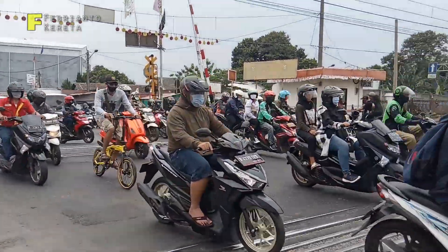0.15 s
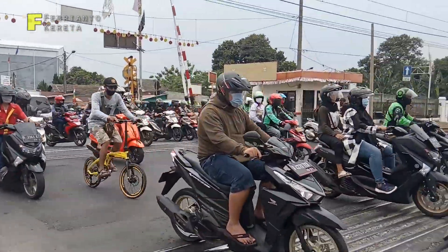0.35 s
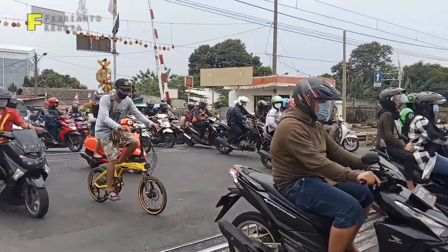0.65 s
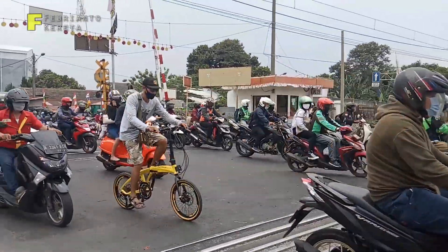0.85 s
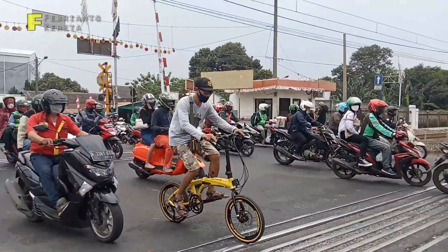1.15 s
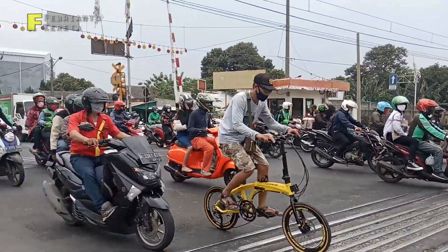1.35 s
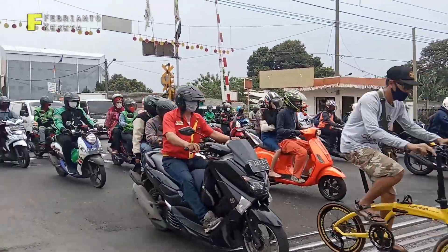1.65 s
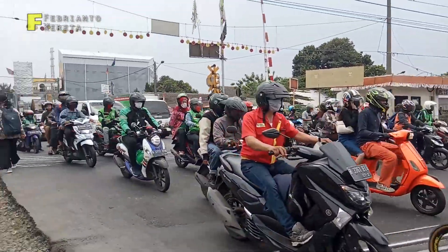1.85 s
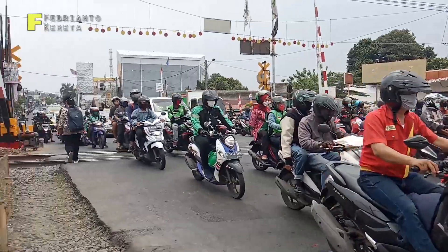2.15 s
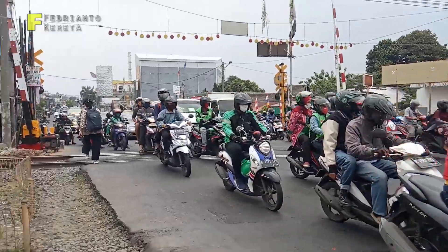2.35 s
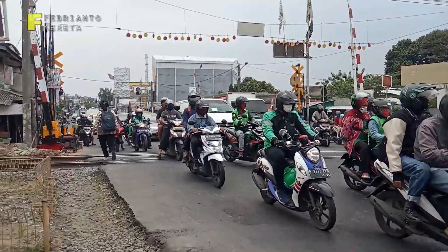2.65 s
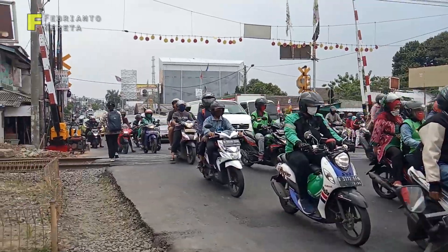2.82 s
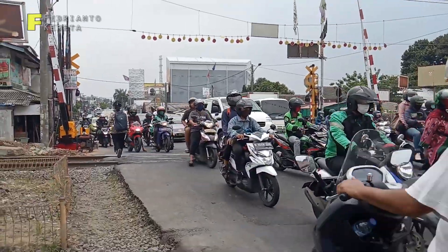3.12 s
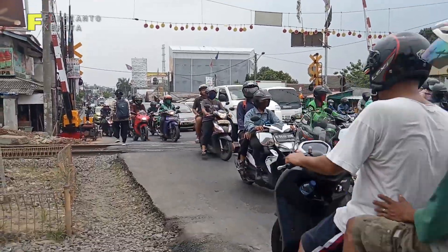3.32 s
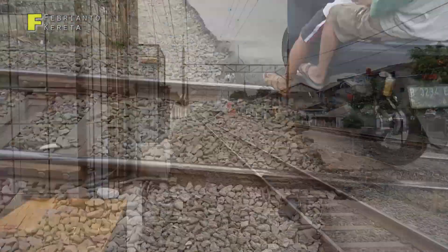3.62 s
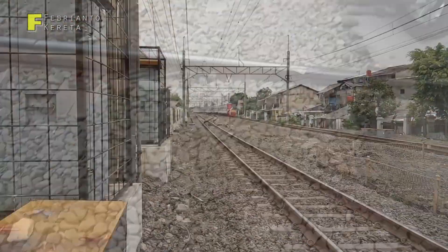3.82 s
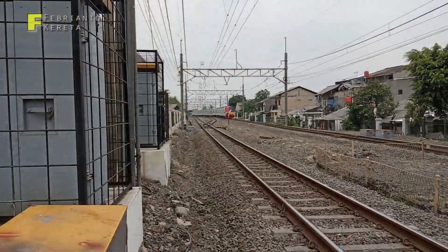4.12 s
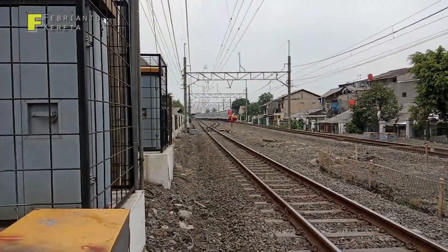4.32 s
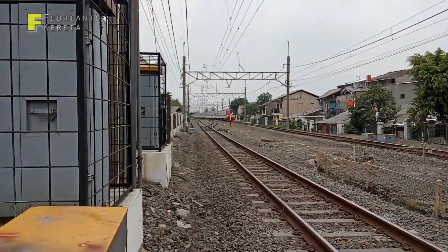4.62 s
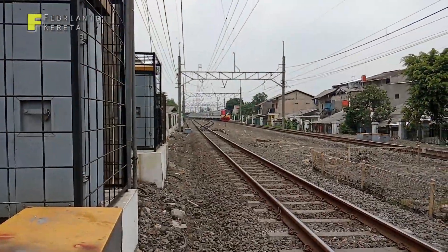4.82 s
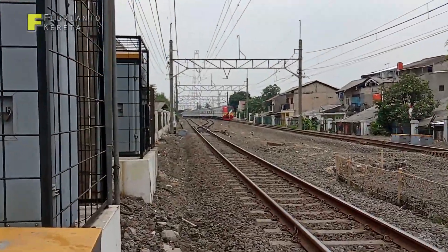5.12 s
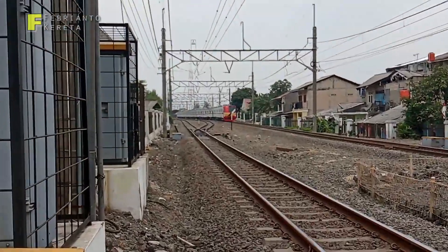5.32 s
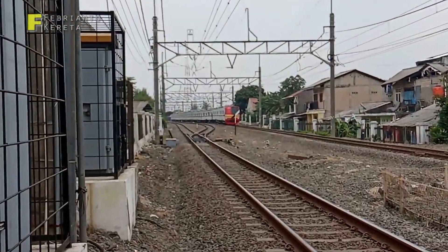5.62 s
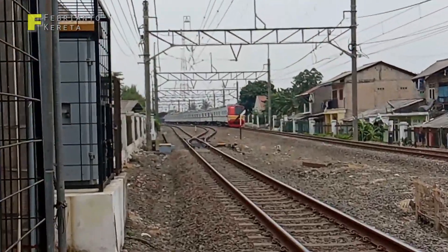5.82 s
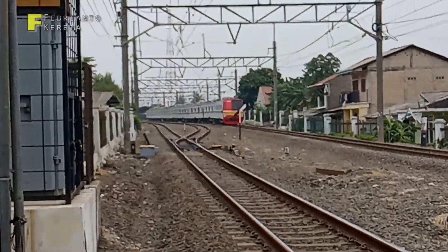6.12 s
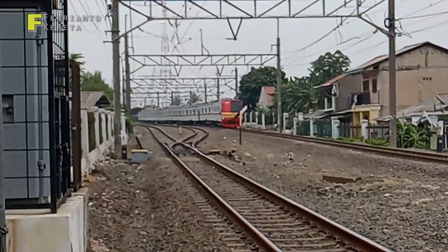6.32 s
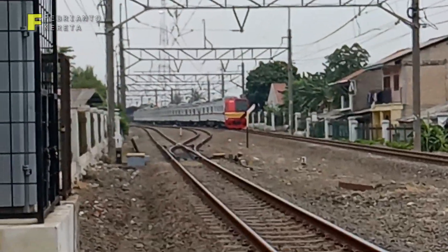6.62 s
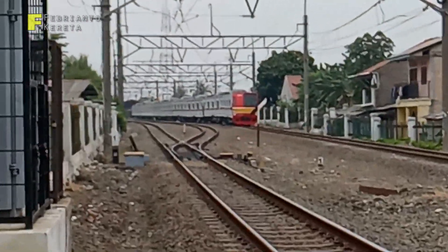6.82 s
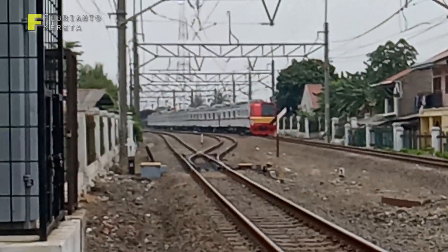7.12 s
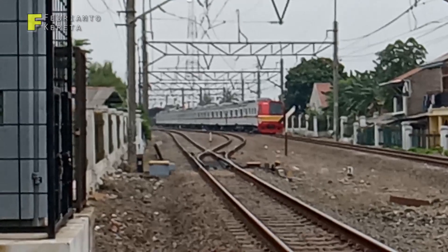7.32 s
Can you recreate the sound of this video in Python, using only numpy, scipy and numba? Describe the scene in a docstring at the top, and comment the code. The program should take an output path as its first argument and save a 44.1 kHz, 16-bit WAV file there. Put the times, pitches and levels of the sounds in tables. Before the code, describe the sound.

A crowd of scooters pulls across a railway crossing; after a brief dropout, a single-cylinder motorcycle chugs close by, speeding up twice.

```python
"""A railway crossing. A crowd of scooters pulls away: exhaust pulses ring the silencers, tyres rumble,
belt drives hiss and squeak. The sound cuts out briefly and fades in beside the track, where a
single-cylinder motorcycle chugs close by over distant traffic. Each firing rings its pipe; it picks up
speed twice and grows louder, with a bark and a rasp while the throttle is open."""
import sys
import numpy as np
from scipy import signal
from scipy.fft import rfft, irfft, next_fast_len
from scipy.io import wavfile
from scipy.ndimage import uniform_filter1d, minimum_filter1d
from numba import njit

SR = 44100
rng = np.random.default_rng(int(sys.argv[2]) if len(sys.argv) > 2 else 0)


def digitize_waveform(pressure):
    """Quantize a signal to 16-bit integers and store it at the path in sys.argv[1].

    Rows of a 2-D input are taken as channels; values are limited to [-1, 1].
    """
    field = np.atleast_2d(pressure).T
    bounded = np.clip(field, -1, 1)
    quanta = np.round(bounded * 32767).astype(np.int16)
    wavfile.write(sys.argv[1], SR, quanta)


N = 328879
TIME = np.arange(N) / SR
CUT_S, RESUME_S = 3.717, 3.812  # crossing ends, trackside begins


def undb(db):
    return 10 ** (np.asarray(db) / 20)


def unit(x):
    """Scale to rms 1."""
    return x / np.sqrt(np.mean(x ** 2) + 1e-20)


def curves(rows):
    """Each column of a table, joined by straight lines in time."""
    s, *columns = np.transpose(rows)
    return [np.interp(TIME, s, c) for c in columns]


def bump(centre_s, half_s):
    """Gaussian swell to 1 and back."""
    return np.exp(-.5 * ((TIME - centre_s) / half_s) ** 2)


def add(out, start_s, sound):
    """Mix a short sound in at its time."""
    i = max(int(start_s * SR), 0)
    out[i:i + len(sound)] += sound[:N - i]


def butter(x, hz, kind, order=2):
    return signal.sosfilt(signal.butter(order, hz, kind, fs=SR, output="sos"), x)


@njit
def band(x, hz, width):
    """State-variable band-pass with a moving centre, gain 1 there."""
    y, band_state, low_state = np.empty(len(x)), 0., 0.
    for i in range(len(x)):
        g, damping = np.pi * hz[i] / SR, width / hz[i]
        v = (band_state + g * (x[i] + 1e-18 - low_state)) / (1 + g * (g + damping))
        band_state = 2 * v - band_state
        low_state += 2 * g * v
        y[i] = damping * v
    return y


def ring(x, modes, tuning=0.93):
    """Parallel resonances (nominal Hz, width Hz, dB), centred at nominal Hz times tuning."""
    return sum(undb(db) * band(x, hz * tuning * np.ones(N), float(width)) for hz, width, db in modes)


def noise(colour):
    """Noise with a spectrum of (Hz, dB) points, rms 1."""
    hz, db = np.transpose(colour)
    size = next_fast_len(N)
    bins_hz = np.arange(size // 2 + 1) * SR / size
    gain = undb(np.interp(np.log(bins_hz + 1), np.log(hz), db))
    return unit(irfft(rfft(rng.standard_normal(size)) * gain, size)[:N])


def walk(rate_hz):
    """Smooth random wander, rms 1."""
    hold = max(int(SR / rate_hz), 2)
    steps = np.repeat(rng.standard_normal(N // hold + 2), hold)
    return unit(uniform_filter1d(steps, hold)[:N])


def firings(rate_hz, scatter_db, jitter_s, start_s=0, phase=0):
    """One slightly uneven pulse per engine cycle; also the place in the cycle, 0-1."""
    turns = phase + np.cumsum(rate_hz * (TIME >= start_s)) / SR
    due = np.flatnonzero(np.diff(np.floor(turns)))
    timing, strength = rng.standard_normal((len(due), 2)).T
    at = np.clip(due + (jitter_s * SR * timing).astype(int), 0, N - 1)
    pulses = np.zeros(N)
    pulses[at] = undb(scatter_db * strength) / np.sqrt(rate_hz[due])
    return pulses, turns % 1


def muffle(x, low_hz, top_hz):
    """A small tailpipe radiates no deep bass; the silencer takes the treble."""
    return butter(butter(x, low_hz, "highpass", order=3), top_hz, "lowpass", order=5)


def street(x, wet_db, fade_s):
    """Walls, fences and vehicles scatter a short tail into the gaps between beats."""
    t = TIME[:SR // 6]
    tail = rng.standard_normal(len(t)) * np.exp(-t / fade_s) * np.clip(t / 0.0048 - 1, 0, 1)
    echoes = signal.fftconvolve(butter(x, 112, "highpass"), tail / np.linalg.norm(tail))[:N]
    return x + undb(wet_db) * echoes


# Tyre spectrum. Each row: frequency in Hz, relative density in dB.
TYRE_COLOUR = [(30, -14.5), (70, 11), (400, 3.5), (700, -2), (930, 0.5), (1080, -3.5), (1250, -2.5),
               (1600, -10.5), (2300, -7.5), (3300, -8.5), (5000, -13.5), (15000, -26.5)]
# Plate rumbles. Each row: centre in seconds, half length in seconds, level in dB.
RUMBLES = [(0.126, 0.16, -30), (2.63, 0.43, -34), (3.67, 0.12, -25.5)]
def tyres(clatter, rolling_db=-32.5):
    """Tyres roll on the road and rumble over the crossing plates."""
    rumble_power = sum((undb(db) * bump(s, half_s)) ** 2 for s, half_s, db in RUMBLES)
    return noise(TYRE_COLOUR) * (1 + 0.14 * clatter) * np.sqrt(undb(rolling_db) ** 2 + rumble_power)


# Belt spectrum. Each row: frequency in Hz, relative density in dB.
BELT_COLOUR = [(2500, -6.5), (3600, -6), (4400, 2), (5100, 0.5), (5900, 3.5), (6600, 2), (7300, -5),
               (8100, -10), (9000, -8.5), (10500, -16.5), (12500, -25), (15500, -52.5)]
def belts(clatter, level_db=-31.5, screen_db=-6):
    """Belts hiss in time with the engines until a scooter stopping in front screens them."""
    screened = np.clip((TIME - 3.54) / 0.13, 0, 1)
    gain = undb(level_db + screen_db * screened + 1.5 * walk(110))
    return noise(BELT_COLOUR) * (1 + 0.084 * clatter) * gain


def passing_belt():
    """One belt hisses smoothly past."""
    return noise(BELT_COLOUR) * bump(1.12, 0.29) * undb(-31)


# Drive speed. Each row: time in seconds, beats per second.
RATTLE_RATE = [(0, 29.4), (.3, 33.5), (.65, 34.6), (.9, 37.3), (1.3, 41)]
# Casing modes. Each row: nominal frequency in Hz, width in Hz, gain in dB.
CASING_MODES = [(4590, 670, 0), (5900, 1200, 0.5), (6600, 470, -2.5)]
def drive_rattle(closest_s=.45, half_s=.42, decay_cycles=.25):
    """A drive rattles its casing once per cycle; the ring drops in pitch as it passes."""
    cycle = np.cumsum(curves(RATTLE_RATE)[0]) / SR % 1
    bursts = rng.standard_normal(N) * np.exp(-cycle / decay_cycles)
    doppler = 1 - .015 * np.tanh((TIME - closest_s) / half_s)
    rattle = butter(ring(bursts, CASING_MODES, doppler), [3100, 7200], "bandpass", order=3)
    return unit(rattle) * bump(closest_s, half_s) * undb(-32.5)


def glide(length_s, start_hz, end_hz, rough):
    """An unsteady gliding tone that swells and dies."""
    size = max(int(length_s * SR), 64)
    wobble = unit(uniform_filter1d(rng.standard_normal(size), size=40))
    hz = np.linspace(start_hz, end_hz, size) * (1 + rough * wobble)
    return np.hanning(size) * np.sin(2 * np.pi * np.cumsum(hz) / SR)


# Falling squeaks. Each row: time in seconds, top rms level in dB, nominal pitch in Hz.
SQUEAKS = [(0.4932, -36, 9000), (0.8799, -40, 8600), (1.3184, -32.5, 8750), (1.5407, -35, 8800),
           (1.722, -33, 8550), (2.063, -27.5, 8730), (2.28, -31.5, 8560), (2.658, -34, 8400),
           (3.0205, -34, 8600), (3.0734, -36, 8460), (3.411, -30, 8500)]
# Squeals. Each row: start and length in seconds, first and last pitch in Hz, top rms level in dB.
SQUEALS = [(0.182, 0.56, 9500, 9800, -44.5), (0.184, 0.026, 970, 1020, -31), (0.733, 0.52, 1100, 1130, -42),
           (2.204, 0.066, 12400, 12500, -40), (2.278, .022, 5730, 5630, -29),
           (2.299, 0.019, 5030, 4930, -23.5), (2.366, 0.11, 12200, 11900, -40),
           (2.885, 0.1208, 12500, 11700, -39), (3.116, 0.059, 1284, 1180, -39)]
def squeaks():
    """Brakes and drives squeak and whine."""
    out = np.zeros(N)
    for s, db, hz in SQUEAKS:
        add(out, s - .012, undb(db + 3) * glide(0.0325, hz * 1.077, hz * 0.985, rough=0.035))
    for s, length_s, start_hz, end_hz, db in SQUEALS:
        add(out, s, undb(db + 3) * glide(length_s, start_hz, end_hz, rough=.014))
    return out


# Wheel strikes. Each row: start in seconds, gain in dB.
RAIL_TICKS = [(2.2862, -44), (2.794, -31), (3.495, -32), (3.621, -29), (3.659, -32)]
def rail_ticks(decay_s=0.012):
    """Metal ticks as wheels cross the rails."""
    t, out = TIME[:SR // 20], np.zeros(N)
    for s, db in RAIL_TICKS:
        burst = butter(rng.standard_normal(len(t)), [3500, 13000], "bandpass")
        add(out, s, undb(db) * burst * np.exp(-t / decay_s))
    return out


# Throttle blips. Each row: centre and half length in seconds, peak firings per second,
# share of peak speed gained, peak silencer frequency in Hz, gain in dB.
REVS = [(0.108, 0.17, 30, 0.35, 149, -29), (0.85, .3, 37.5, 0.13, 376, -31.5),
        (1.719, .17, 46, .22, 223, -26.5), (2.199, .16, 44, .16, 251, -32),
        (3.65, 0.1008, 41, .1, 371, -27.5), (3.752, 0.21, 40, 0.16, 202, -23)]
def revs():
    """Riders blip the throttle: the beat quickens, swells and sinks back."""
    out = 0
    for s, half_s, peak_hz, rise, pipe_hz, db in REVS:
        effort = bump(s, half_s)
        speed = 1 - rise * (1 - effort)
        pulses, _ = firings(peak_hz * speed, scatter_db=1.5, jitter_s=.0001)
        pipe = ring(pulses, [(pipe_hz, 28, 0), (pipe_hz * 1.8, 70, -11)], speed)
        out += unit(muffle(pipe, low_hz=91, top_hz=527)) * np.sqrt(effort) * undb(db)
    return out


def nearness(closest_s, half_power_s=0.7):
    """Gain of a scooter passing in a straight line."""
    return 1 / np.hypot(1, (TIME - closest_s) / half_power_s)


# Nearest scooter's speed. Each row: time in seconds, firings per second.
LEAD_RATE = [(0.0, 30.64), (0.713, 32.55), (1.8, 29.4), (2.2, 29.7), (2.9, 30.1), (3.15, 30.7),
             (3.72, 31.4)]
# Its silencer. Each row: nominal frequency in Hz, width in Hz, gain in dB.
LEAD_MODES = [(112, 36, 2), (165, 55, 0), (240, 48, 0), (374, 18, 3), (400, 24, -12), (490, 80, -22)]
# Other scooters. Each row: first and last firings per second, nominal silencer frequency in Hz,
# closest time in seconds, relative level in dB.
CROWD = [(26, 31, 165, .3, 1), (37, 45, 104, 1.5, 0), (22, 29, 185, 1.7, -2), (46, 38, 115, 3.2, -2),
         (16, 22, 95, 2.4, -1), (32, 39, 180, 3.6, -3)]
def scooter_exhausts(start_db=-24, rise_db_per_s=2.23):
    """Exhausts beat against each other and swell; also returns the engines' joint pulsing, clatter."""
    on = TIME < CUT_S
    pulses, cycle = firings(curves(LEAD_RATE)[0], scatter_db=1.5, jitter_s=.00014)
    lead = muffle(ring(pulses, LEAD_MODES), low_hz=88.3, top_hz=415)
    others, clatter = 0, np.exp(-cycle / 0.89)
    for first_hz, last_hz, pipe_hz, closest_s, db in CROWD:
        rate_hz = np.interp(TIME, [0, CUT_S], [first_hz, last_hz]) * (1 + .035 * walk(2.5))
        pulses, cycle = firings(rate_hz, scatter_db=1.5, jitter_s=.00012, phase=rng.random())
        gain = undb(db) * nearness(closest_s)
        pipe = ring(pulses, [(pipe_hz, 55, 0), (pipe_hz * 2, 70, -12)])
        others += gain * unit(muffle(pipe, low_hz=90, top_hz=434))
        clatter += gain * np.exp(-cycle / 0.37)
    lead_gain = undb(3.2) * nearness(closest_s=2.65)
    mix = (lead_gain * lead / np.std(lead[on]) + others / np.std(others[on])) / np.hypot(1, lead_gain)
    exhaust = street(mix, wet_db=-9, fade_s=.03) * undb(start_db + rise_db_per_s * TIME)
    return exhaust, clatter / np.mean(clatter[on]) - 1


# Distant road, belt and engine spectra. Each row: frequency in Hz, relative density in dB.
FAR_ROAD = [(30, -7), (100, 17), (350, 3), (600, 2.5), (1000, -14.5), (1500, -17.5), (2200, -13),
            (3200, -16.5), (5000, -19), (10000, -23), (15000, -31)]
FAR_BELTS = [(2500, -1), (3600, -3), (4600, 1.5), (5400, 0), (6500, 4.5), (7400, -4), (8100, -6),
             (9200, -6), (11000, -14), (15500, -49)]
FAR_ENGINES = [(25, -28), (45, -68), (80, 1.5), (115, 5.5), (230, 1.5), (370, -12), (500, -20.5),
               (900, -26.5), (4000, -71)]
def far_traffic(bike_cycle):
    """Traffic wash, pulsed by the motorcycle's gas puffs; hiss and drone ebb as scooters leave."""
    elapsed_s = TIME - RESUME_S
    puff = np.exp(-bike_cycle / 0.043)
    road = noise(FAR_ROAD) * (1 + 1.44 * puff) * undb(-34 + 1.5 * walk(70))
    leaving = undb(-36.5 - 11 * np.maximum(elapsed_s, 0))
    hiss_gain = np.hypot(undb(-42.5), leaving)
    hiss = noise(FAR_BELTS) * (1 + 0.14 * puff) * hiss_gain * undb(1.9 * walk(80))
    engines = noise(FAR_ENGINES) * undb(-20.5 - 2.5 * elapsed_s + walk(25))
    return road + hiss + engines


# Jolts. Each row: start in seconds, level in dB.
JOLTS = [(4.098, -37), (4.135, -36), (4.255, -37), (4.487, -36), (4.56, -37)]
# Loose metal spectrum. Each row: frequency in Hz, relative density in dB.
METAL_COLOUR = [(900, -16), (2000, 0), (2600, -1), (3400, -8), (4900, 1), (5600, 0.5), (6450, 6),
                (7100, -3), (10500, -13), (15000, -30)]
def loose_parts(start_s=4.04, end_s=4.72, edge_s=0.12, decay_s=0.028, grit_db=3):
    """Loose metal rustles and jolts as the last scooters cross the rails."""
    t, jolts = TIME[:SR // 10], np.zeros(N)
    for s, db in JOLTS:
        add(jolts, s, undb(db) * np.exp(-t / decay_s))
    rustle = undb(-39.5) * np.clip(np.minimum(TIME - start_s, end_s - TIME) / edge_s, 0, 1)
    return noise(METAL_COLOUR) * np.hypot(rustle, jolts) * undb(grit_db * walk(500))


# Follower's silencer. Each row: nominal frequency in Hz, width in Hz, gain in dB.
FOLLOWER_MODES = [(320, 42, 9), (403, 16, 1.5), (503, 46, -3.5)]
# Its rasp spectrum. Each row: frequency in Hz, relative density in dB.
FOLLOWER_RASP = [(300, -20), (600, 5.5), (1100, 1.5), (1900, -2), (2800, -8), (3800, -6), (8000, -23),
                 (15000, -29)]
def follower(final_rate_hz=40, growth_per_s=.25):
    """A scooter comes up behind the motorcycle: a quicker beat and a coarse rasp."""
    rate_hz = final_rate_hz * np.exp(growth_per_s * (TIME - TIME[-1])) * (1 + .02 * walk(3))
    pulses, cycle = firings(rate_hz, scatter_db=2.5, jitter_s=.0003)
    exhaust = unit(muffle(ring(pulses, FOLLOWER_MODES), low_hz=199, top_hz=560))
    rasp = noise(FOLLOWER_RASP) * unit(np.exp(-cycle / 0.64))
    return exhaust * bump(7.4, .24) * undb(-24.5) + rasp * bump(7.01, 0.34) * undb(-38.5)


# Knocks. Each row: start in seconds, level in dB.
KNOCKS = [(4.749, -32), (5.302, -35), (5.408, -38), (5.459, -39), (5.551, -42), (5.671, -35),
          (5.707, -35.5), (5.81, -40), (5.843, -37), (6.061, -32), (6.091, -34), (6.515, -37), (6.576, -30),
          (6.663, -34), (6.777, -30), (6.83, -32), (7.02, -28.5), (7.074, -34), (7.315, -32)]
# Struck metal. Each row: nominal frequency in Hz, width in Hz, gain in dB.
KNOCK_MODES = [(1750, 340, -10), (2250, 300, 2), (6000, 2800, -10.5)]
def knocks(decay_s=.0045):
    """Slack in the chain and engine lets single knocks ring the metal."""
    t, strikes = TIME[:SR // 50], np.zeros(N)
    for s, db in KNOCKS:
        add(strikes, s, undb(db) * np.exp(-t / decay_s))
    metal = butter(ring(rng.standard_normal(N), KNOCK_MODES), [1200, 7000], "bandpass")
    return unit(metal) * strikes


# Cylinder head. Each row: nominal frequency in Hz, width in Hz, gain in dB.
HEAD_MODES = [(1090, 530, -12), (2310, 370, 4.5), (5300, 2900, 4.5)]
def valves(cycle, speed_octaves):
    """Valves seat twice a cycle and ring the cylinder head."""
    seating = np.exp(-cycle / 0.024) + 0.67 * np.exp(-((cycle - .6) % 1) / 0.058)
    ticks = butter(ring(rng.standard_normal(N) * seating, HEAD_MODES), 9500, "lowpass", order=3)
    return ticks * undb(-36.5 + 12.5 * speed_octaves + 2.1 * walk(23))


# Motorcycle rasp spectrum. Each row: frequency in Hz, relative density in dB.
RASP_COLOUR = [(600, -7), (1150, -4), (1600, 9), (2300, -7), (3200, -22), (5500, -2.5), (8000, -18),
               (15000, -38)]
def load_rasp(cycle, opening, lag_cycles=0.11, decay_cycles=0.13):
    """Under load a rasp follows each firing."""
    burst = np.exp(-((cycle - lag_cycles) % 1) / decay_cycles)
    return noise(RASP_COLOUR) * undb(-35.5) * opening * burst


# Deepest exhaust mode. Each row: time in seconds, gain in dB, decay in seconds.
BOOM = [(3.9, -25.5, .07), (4.2, -23, .07), (5.0, -20.5, .07), (5.4, -20, .07), (5.8, -18, .07),
        (6.3, -18.5, .06), (6.6, -19.5, .036), (7.1, -19.5, .03), (7.46, -21, .03)]
def boom(age_s, heat, nominal_hz=98):
    """Each firing restarts the deepest resonance; it dies sooner once the engine runs fast."""
    db, decay_s = curves(BOOM)
    swing = np.sin(2 * np.pi * nominal_hz * np.sqrt(heat) * age_s) * np.exp(-age_s / decay_s)
    swing = butter(butter(swing, 210, "lowpass", order=3), 62, "highpass", order=3)
    return swing / np.std(swing[TIME > RESUME_S]) * undb(db)


# Middle pipe modes. Each row: nominal frequency in Hz, width in Hz, gain in dB.
THUMP_MODES = [(140, 30, -13), (178, 24, -7), (206, 17, 8.3), (238, 24, -5), (326, 34, -.5)]
def thump(blast, heat):
    """Each blast rings the pipe; hotter gas raises the resonances."""
    pipe = ring(blast, THUMP_MODES, heat * (1 + .018 * walk(7)))
    pipe = butter(butter(pipe, 90, "highpass"), 420, "lowpass", order=4)
    return pipe / np.std(pipe[TIME > RESUME_S])


# Upper pipe modes. Each row: nominal frequency in Hz, width in Hz, gain in dB.
BARK_MODES = [(455, 70, 0), (585, 65, -9), (690, 60, -8.5), (745, 62, -6), (850, 70, -9), (950, 60, -13)]
def bark(blast, heat, reach_hz, fall_db_per_khz=55):
    """The pulse echoes in the pipe, inverted each trip; only modes within its reach ring fully."""
    trip_s = .0077 / (heat * (1 + .03 * walk(6)))
    echoed = sum((-1) ** trip * undb(db) * np.interp(TIME - trip * trip_s, TIME, blast)
                 for trip, db in enumerate([0, -3, -10]))
    pipe = 0
    for mode in BARK_MODES:
        beyond_khz = np.maximum(mode[0] - reach_hz, 0) / 1000
        pipe += ring(echoed, [mode], heat * (1 + .03 * walk(2.78))) * undb(-fall_db_per_khz * beyond_khz)
    dull = butter(pipe, [400, 800], "bandpass", order=5)
    bright = butter(pipe, [410, 940], "bandpass", order=5)
    sharpness = np.clip((reach_hz - 760) / 150, 0, 1)
    blend = dull * np.sqrt(1 - sharpness) + bright * np.sqrt(sharpness)
    return blend / np.std(blend[TIME > RESUME_S])


# Grip turns. Each row: time in seconds, opening from 0 to 1.
THROTTLE = [(4.68, 0.63), (5.38, 0.51), (5.88, 0.47), (6.48, 0), (6.72, 0)]
def throttle(turn_s=0.13):
    """The grip holds each opening until the next quick turn."""
    opening = np.zeros(N)
    for s, target in THROTTLE:
        opening += (target - opening) * np.clip((TIME - s) / turn_s + .5, 0, 1)
    return opening


def gas_blast(pulses, cycle, speed_octaves, opening):
    """Turbulence trails each pulse, most when coasting fast; wall scatter is strongest at idle."""
    on = TIME > RESUME_S
    gas = rng.standard_normal(N) * np.exp(-cycle / 0.52) * np.std(pulses[on]) * on
    turbulence = .28 + .5 * np.maximum(speed_octaves, 0) * (1 - opening)
    return street(pulses + turbulence * gas, wet_db=-3 - 11 * speed_octaves - 9 * opening, fade_s=.025)


# Engine speed. Each row: time in seconds, firings per second.
BIKE_RATE = [(3.8, 11.83), (4.202, 12.62), (4.658, 12.26), (4.754, 19.02), (5.117, 20.33), (5.374, 17.1),
             (5.724, 15.45), (5.894, 17.59), (6.338, 20.1), (6.706, 23.07), (7.46, 22.98)]
# Exhaust gas. Each row: time in seconds, heat as a tuning factor, reach of the pulse in Hz.
BIKE_GAS = [(3.8, .98, 480), (4.6, .98, 480), (4.8, 1.0, 840), (5.3, 1.0, 770), (5.55, .97, 670),
            (5.85, .97, 650), (6.02, .99, 950), (6.3, 1.03, 980), (6.5, 1.05, 840), (6.75, 1.075, 860),
            (7.46, 1.085, 840)]
def motorcycle(idle_hz=13.95, away_s=6.89, away_db_per_s=6.5):
    """One cylinder fires, harder with speed and throttle, then draws away; also returns its cycle."""
    rate_hz, opening = curves(BIKE_RATE)[0], throttle()
    speed_octaves = np.log2(rate_hz / idle_hz)
    heat, reach_hz = curves(BIKE_GAS)
    pulses, cycle = firings(rate_hz, scatter_db=1, jitter_s=.00012, start_s=RESUME_S - .012)
    blast = gas_blast(pulses, cycle, speed_octaves, opening)
    exhaust = thump(blast, heat) * undb(-24.8 + 12.5 * speed_octaves + 2 * opening)
    exhaust += bark(blast, heat, reach_hz) * undb(-42.8 + 5 * speed_octaves + 15.5 * opening)
    exhaust *= undb(-away_db_per_s * np.maximum(TIME - away_s, 0))
    treble = valves(cycle, speed_octaves) + load_rasp(cycle, opening)
    return treble - exhaust - boom(cycle / rate_hz, heat), cycle


def scene(fade_in_s=0.3):
    """The crossing stops dead; after a short silence the trackside fades in."""
    exhausts, clatter = scooter_exhausts()
    crossing = exhausts + tyres(clatter) + belts(clatter) + revs()
    crossing += drive_rattle() + passing_belt() + squeaks() + rail_ticks()
    bike, cycle = motorcycle()
    trackside = bike + far_traffic(cycle) + follower() + loose_parts() + knocks()
    cut = np.clip((CUT_S - TIME) / .002, 0, 1)
    fade_in = (TIME > RESUME_S) * np.clip(0.067 + (TIME - RESUME_S) / fade_in_s, 0, 1)
    return (cut * crossing + fade_in * trackside)[None]


def limiter(x, ceiling=0.54, recover_db_per_s=13):
    """Gain drops ahead of loud beats and recovers slowly, ducking the background."""
    over_db = 20 * np.log10(np.maximum(np.abs(x[0]) / ceiling, 1))
    recovery_db = recover_db_per_s * TIME
    cut_db = np.maximum.accumulate(over_db + recovery_db) - recovery_db
    return x * undb(uniform_filter1d(minimum_filter1d(-cut_db, size=1600), size=1600))


def record(dry, clip_level=.58, low_hz=38, top_hz=15750):
    """Limit the level, round the peaks, cut the deep bass and the top."""
    held = limiter(dry)
    rounded = held / (1 + (held / clip_level) ** 8) ** (1 / 8)
    top_cut = signal.ellip(8, .2, 70, top_hz, fs=SR, output="sos")
    return signal.sosfilt(top_cut, butter(rounded, low_hz, "highpass", order=1))


dry = scene()
out = record(dry)
digitize_waveform(out)
```